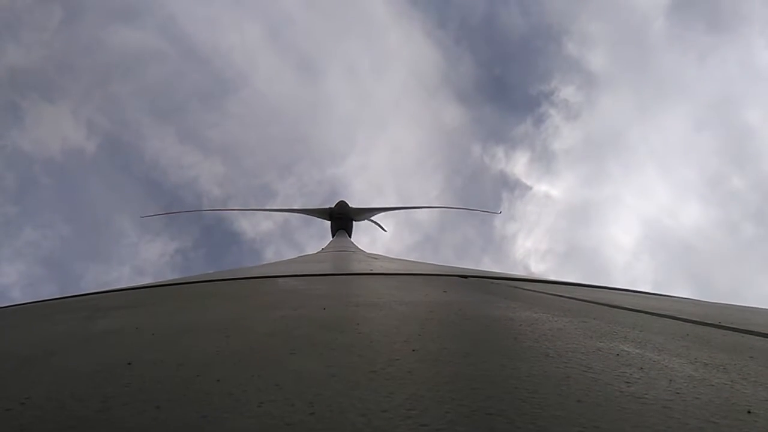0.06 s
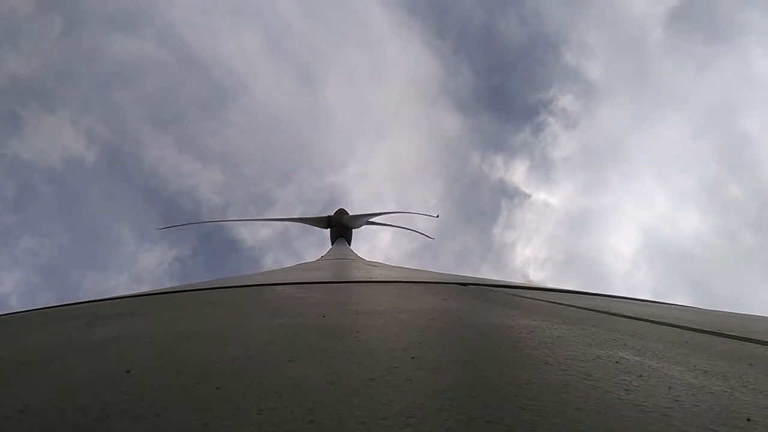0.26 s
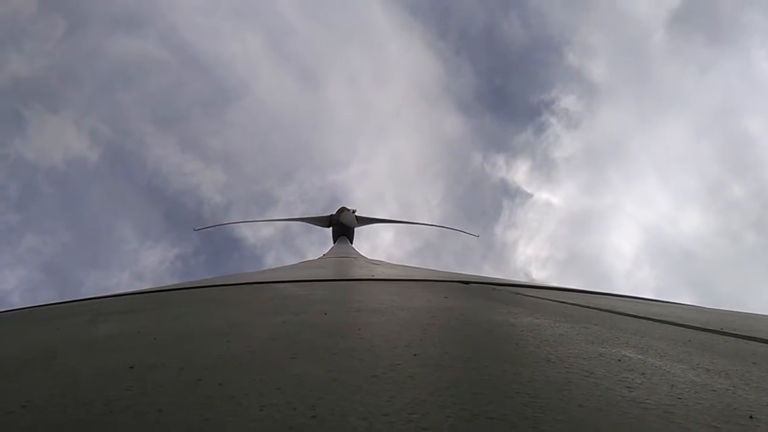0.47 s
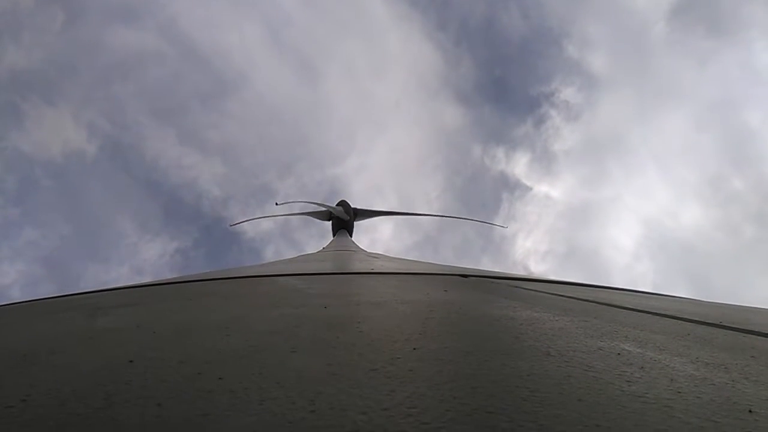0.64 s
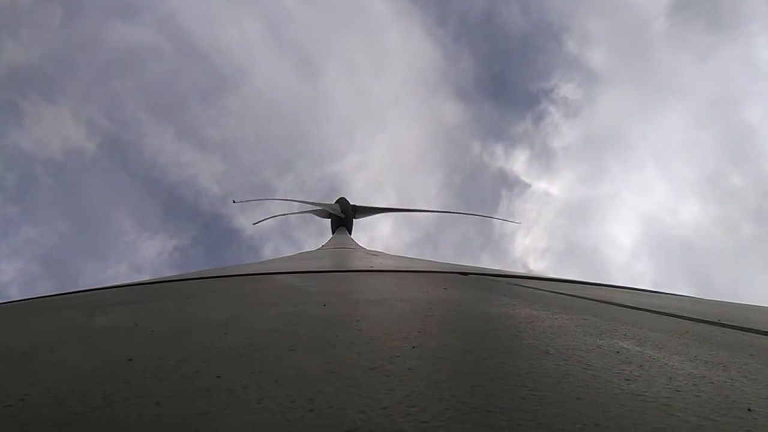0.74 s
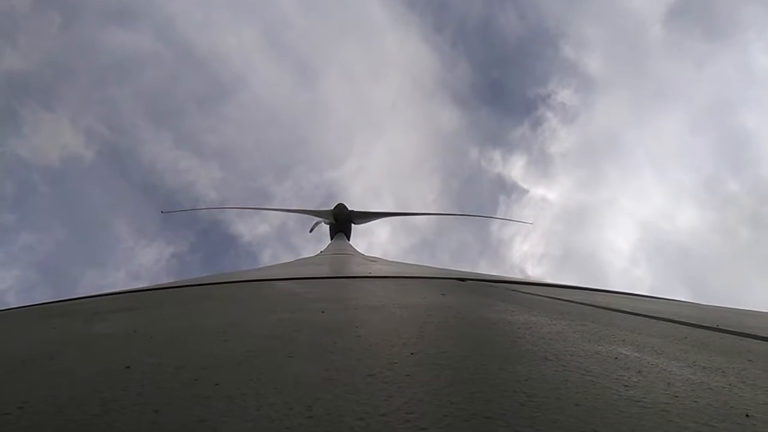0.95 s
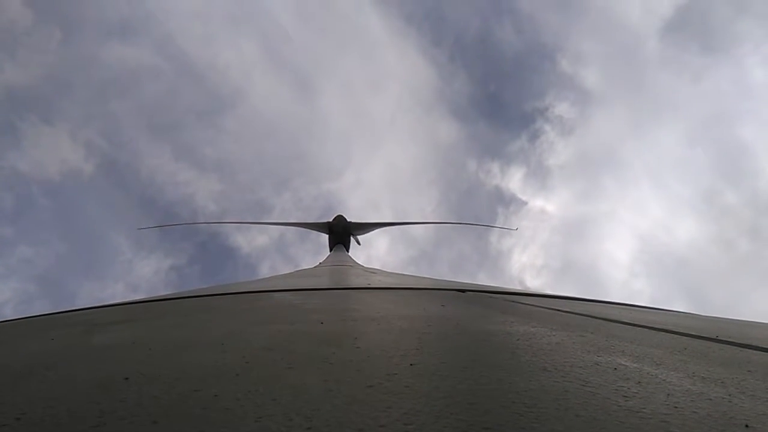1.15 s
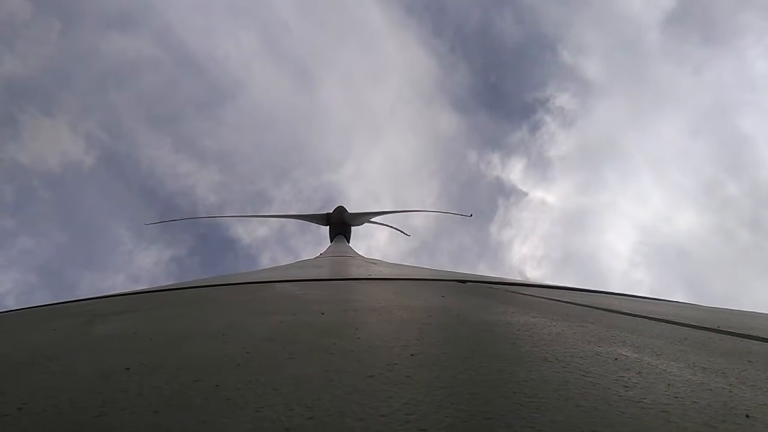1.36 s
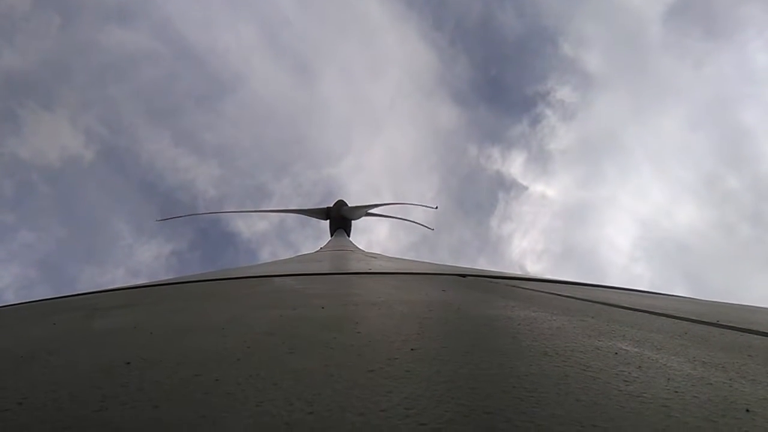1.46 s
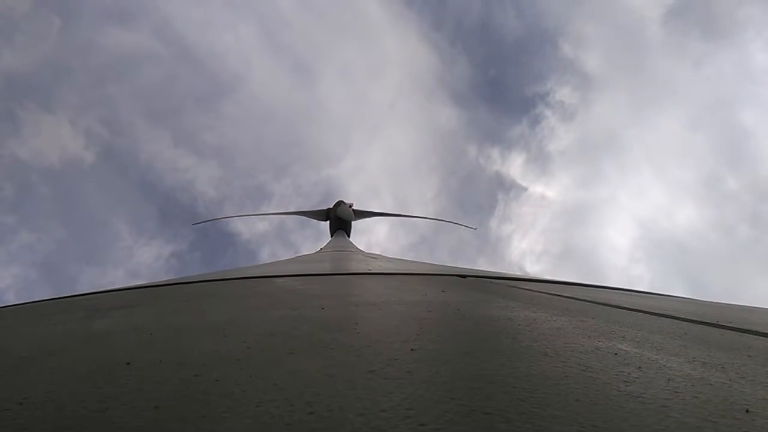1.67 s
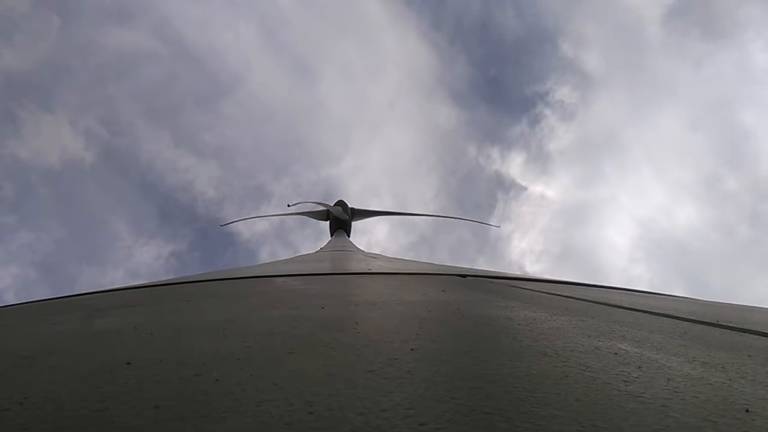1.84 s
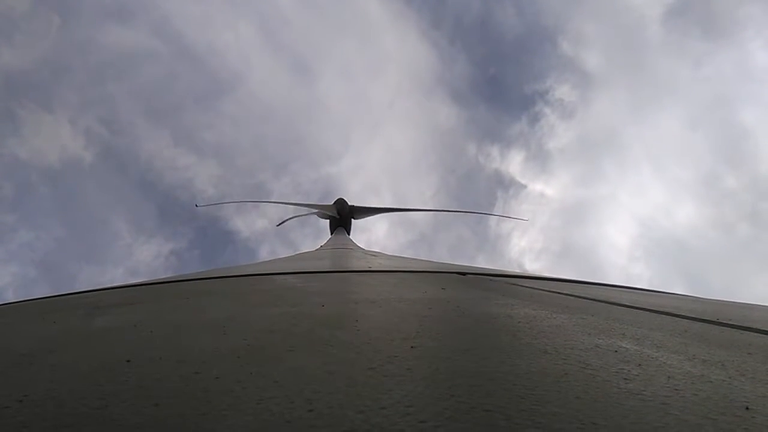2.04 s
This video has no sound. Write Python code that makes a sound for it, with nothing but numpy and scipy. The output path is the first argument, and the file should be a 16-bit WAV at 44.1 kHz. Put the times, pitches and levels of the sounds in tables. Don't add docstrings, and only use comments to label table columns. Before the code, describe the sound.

Low, lumpy wind buffeting dominates outdoors, swelling and dropping with thumps and pops. Fingers click and rub the camera case early on; distant turbine air hisses faintly, and one soft blade swish passes near the end.

```python
import sys
import numpy as np
from scipy import signal
from scipy.io import wavfile
from scipy.ndimage import uniform_filter1d

SR = 44100
rng = np.random.default_rng(int(sys.argv[2]) if len(sys.argv) > 2 else 0)


def bounce(signal):
    frames = np.transpose(np.atleast_2d(signal))
    limited = np.clip(frames, -1, 1)
    pcm = np.round(limited * 32767).astype(np.int16)
    wavfile.write(sys.argv[1], SR, pcm)


def ratio_of_db(decibels):
    return 10 ** (np.asarray(decibels, float) / 20)


N = 92610


def evened(x):
    return x / np.sqrt(np.mean(x ** 2) + 1e-20)


def read(points, hz):
    f, value = np.transpose(points)
    return np.interp(np.log(hz + 1), np.log(f + 1), value)


def add(mix, start_s, sound):
    part = mix[round(start_s * SR):][:len(sound)]
    part += sound[:len(part)]


def bins_and_times(size):
    hz = np.fft.rfftfreq(size, 1 / SR)[:, None]
    t = np.arange(N * 4 // size + 5) * size / 4 / SR
    return hz, t


def noise(db, size):
    a, b = rng.standard_normal(db.shape[::-1] + (2,)).T
    return signal.istft((a + 1j * b) * ratio_of_db(db), nperseg=size, noverlap=size * 3 // 4)[1][:N]


def patches(shape, bins, frames):
    z = rng.standard_normal(shape[::-1]).T
    z = uniform_filter1d(z, size=bins, axis=0)
    return evened(uniform_filter1d(z, size=frames, axis=1))


def unit(db):
    return db - 10 * np.log10((ratio_of_db(db) ** 2).sum(0, keepdims=True))


# t/s, level/dB
GUST = [(0.0, -63), (0.06, -39.5), (0.13, -53), (0.3, -23.5), (0.58, -21.5), (0.87, -40), (0.99, -36),
        (1.08, -55), (1.14, -22), (1.22, -31.5), (1.48, -30.5), (1.52, -25.5), (1.64, -36.5), (1.75, -33),
        (1.78, -42.5), (1.83, -32.5), (1.89, -50), (2.1, -37.5)]
# f/Hz, level/dB [dB per Hz]
CALM = [(12, -65), (20, -31), (40, -6.5), (65, 6), (310, -28.5), (341, -29.5), (515, -50), (900, -33),
        (1170, -74), (1980, -120)]
# f/Hz, level/dB [dB per Hz]
GALE = [(12, -43), (20, 6.5), (70, 1), (126, 2), (217, -6), (323, -13), (409, -23), (715, -37), (1500, -55),
        (1950, -83), (3300, -120)]


def gusts():
    calm_db, gale_db, gust_db = -41, -24.5, -1.5
    patch_db, lump_db, lumps_per_s = 3, 1.5, 22
    hz, t = bins_and_times(2048)
    strong = np.clip((np.interp(t, *np.transpose(GUST)) - calm_db) / (gale_db - calm_db), 0, 1)
    calm = read(CALM + [(3000, -86)], hz)
    gale = read(GALE + [(4000, -100)], hz)
    colour = (1 - strong) * calm + strong * gale
    colour = unit(colour + patch_db * patches(colour.shape, bins=4, frames=3))
    eddies = evened(noise(colour, size=2048))

    power = uniform_filter1d(uniform_filter1d(eddies ** 2, size=2500), size=1500)
    steady = eddies / np.sqrt(power)
    s = np.arange(N) / SR
    rates = lumps_per_s * np.geomspace(.3, 2, num=24)
    lumps = evened(sum(np.sin(2 * np.pi * (f * s + rng.random())) for f in rates))
    lumpy = steady * evened(ratio_of_db(lump_db * lumps))
    level = ratio_of_db(gust_db + np.interp(s, *np.transpose(GUST)))
    return (lumpy + flutter(np.interp(s, t, strong))) * level


def tower():
    centre_hz, width_hz, level_db = 185, 50, -59
    hz, t = bins_and_times(2048)
    field = -20 * np.log10(1 + (2 * (hz - centre_hz) / width_hz) ** 2) + 0 * t
    return ratio_of_db(level_db) * evened(noise(field, size=2048))


# f/Hz, level/dB [dB per Hz]
WASH = [(80, -32.5), (190, -8.5), (450, -23.5), (1300, -33.5), (2400, -44.5), (5000, -46), (7800, -43.5),
        (14500, -56.5)]
# t/s, level/dB, boost or scoop of a middle band [dB]
WASH_LEVEL = [(0.0, -63.5, 2), (.1, -59, -8), (.2, -57.5, 1), (0.4, -56.5, -0.5), (0.67, -57.5, 0.5),
              (.95, -62, 6), (1.07, -64.5, -5.5), (1.33, -62, -2.5), (1.45, -60.5, -1.5),
              (1.74, -60.5, 1.5), (2.1, -61, -0.5)]


def wash_power(hz, t):
    wash_db, patch_db, scoop_hz, scoop_octaves = 8, .8, 5060, 0.34
    s, db, scoop_db = np.transpose(WASH_LEVEL)
    wash = unit(read(WASH, hz)) + wash_db + np.interp(t, s, db)
    scoop = np.exp(-(np.log2((hz + 1) / scoop_hz) / scoop_octaves) ** 2 / 2)
    wash = wash + np.interp(t, s, scoop_db) * scoop
    return ratio_of_db(wash + patch_db * patches(wash.shape, bins=4, frames=40)) ** 2


# t/s, length [s], level/dB, share of the high resonance [0-1], fade by 60 dB [s]
RUBS = [(0.033, 0.013, -62, .7, 0.04), (0.048, .03, -66, 0, 0.64), (0.307, 0.048, -63.5, 0.6, 0.074),
        (0.378, 0.019, -52.5, 0.58, 0.019), (0.525, 0.012, -43, 0.32, 0.05), (0.535, 0.0075, -52, 0, 0.053),
        (.577, 0.0099, -54, 0.5, 0.033), (0.595, 0.0084, -49.5, 0.25, 0.026),
        (0.717, 0.008, -60, 0.5, 0.026), (0.61, 0.015, -47, 0.34, 0.044), (0.732, 0.038, -59.5, 0.79, 0.46),
        (0.817, 0.017, -48, 0.88, 0.14), (0.826, 0.058, -59.5, 0.94, 0.53), (1.004, 0.069, -72, 1, .05),
        (1.13, 0.069, -67.5, 1, 0.05), (1.07, 0.19, -75.5, 1, .3)]
# f/Hz, level/dB [dB per Hz]
RUB_LOW = [(1000, -18), (2300, -19), (3300, -8), (4200, -3), (5500, -6), (6300, -15), (9000, -24),
           (14000, -33)]
# f/Hz, level/dB [dB per Hz]
RUB_HIGH = [(2500, -10.5), (5500, -20), (7200, 1), (8600, 0.5), (11000, -16.5), (14000, -21)]


def rub_power(hz, t):
    rise_s, grit_db = .004, 4
    low, high = (ratio_of_db(2 * unit(read([(200, -52)] + k, hz))) for k in (RUB_LOW, RUB_HIGH))
    grit = ratio_of_db(2 * grit_db * patches((len(hz), len(t)), bins=8, frames=2))
    power = 0
    for start, length, db, share, t60 in RUBS:
        fade_db = -60 * np.maximum(t - start - length, 0) / t60
        shape = np.clip((t - start) / rise_s, 0, 1) * ratio_of_db(db + fade_db)
        power = power + shape ** 2 * ((1 - share) * low + share * high) * grit
    return power


TICK_S = [.0426, .0433, .0456, .0518, .2266, .2268, .5355, .5769, .7158, .7179, .7194, .7212, .7433, .747,
          .752, .8183, 1.24, .0517, .5768, .8182, .761]
# level/dB, snap f/Hz, ring level/dB, ring fade by 60 dB [s]
TICKS = [(-40, 8000, -20, .006), (-34, 8100, -8, .006), (-41, 7500, -14, .005), (-18.5, 7430, -21, 0.018),
         (-35, 11000, -30, .006), (-24, 6200, -9.5, 0.027), (-29.5, 6300, 0.5, 0.0088),
         (-19.5, 8500, -14.5, 0.014), (-37, 7700, -12, .006), (-20, 7230, -10.5, 0.016),
         (-32, 4800, -2.5, 0.019), (-30, 6600, -15, .006), (-47, 6700, -15, .01), (-44, 8700, -20, .006),
         (-40, 8500, -23, .006), (-18.5, 8200, -15, 0.011), (-50, 6800, -27, .006), (-28, 11000, -40, .006),
         (-38, 12000, -40, .006), (-37, 13600, -40, .006), (-44, 9300, -30, .006)]
# f/Hz, level/dB
RING = [
    (4050, 0),
    (4400, -6),
    (3720, -8),
]


def ticks():
    lead_s, snap_s = .001, .00011
    ring_rise_s, sag, sag_s = .0004, .4, .0012
    out = np.zeros(N)
    u = np.arange(2000) / SR - lead_s
    late = np.maximum(u, 0)
    band = signal.butter(2, [5000, 11500], "band", fs=SR)
    sagging = late + sag * sag_s * (1 - np.exp(-late / sag_s))
    ring = sum(ratio_of_db(db) * np.sin(2 * np.pi * hz * sagging) for hz, db in RING)
    ring = (1 - np.exp(-late / ring_rise_s)) * ring
    rattle_level = ratio_of_db(-32.5 - 60 * late / 0.052) + ratio_of_db(-16 - 60 * late / .007)
    rattle_level = rattle_level * ratio_of_db(60 * (u - late) / .003)
    grains = rng.standard_normal((len(TICKS), 2000))
    for start, (db, snap_hz, ring_db, t60), z in zip(TICK_S, TICKS, grains):
        snap = np.exp(-(u / snap_s) ** 2 / 2) * np.cos(2 * np.pi * snap_hz * u)
        rattle = signal.lfilter(*band, z) * rattle_level
        ringing = ratio_of_db(ring_db - 60 * late / t60) * ring
        add(out, start - lead_s, ratio_of_db(db) * (snap + rattle + ringing))
    return out


# t/s, level/dB, f/Hz, fade by 60 dB [s]
KNOCKS = [(.0519, -27, 2770, .004), (0.0509, -34.5, 1140, 0.0042), (0.0575, -24, 1290, 0.0013),
          (.0578, -37, 606, 0.0056), (0.0817, -42, 1500, .004), (0.227, -22, 2700, 0.0017),
          (0.5777, -38.5, 2720, 0.0045), (0.7176, -32, 2470, 0.0047), (0.72, -38.5, 2680, 0.0083),
          (.7415, -48, 2680, .005), (.8185, -32.5, 2600, 0.0075), (.8183, -31, 1050, 0.0082)]


def knocks():
    out, t = np.zeros(N), np.arange(2000) / SR
    for start, db, pitch_hz, t60 in KNOCKS:
        add(out, start, ratio_of_db(db - 60 * t / t60) * np.sin(2 * np.pi * pitch_hz * t))
    return out


def burst(u):
    return (1 - u ** 2) * np.exp(-u ** 2 / 2)


def flutter(strong):
    per_s, level_db, spread_db, widths_ms = 160, -18.5, 2.5, (0.42, 0.51, 0.75)
    t_ms = np.arange(-200, 201) / SR * 1000
    out = np.zeros(N)
    for width_ms in widths_ms:
        a, b, c = rng.random((N, 3)).T
        happens = a < strong * per_s / len(widths_ms) / SR
        train = happens * np.sign(b - .5) * ratio_of_db(-spread_db * np.log(c + 0.049))
        out += np.convolve(train, burst(t_ms / width_ms), "same")
    return ratio_of_db(level_db) * out


# t/s, level/dB, f/Hz, length [s]
ROLLS = [(0.22, -33, 85, 0.027), (0.24, -23, 58, 0.012), (0.31, -17.5, 100, 0.02), (0.421, -30, 82, 0.035),
         (0.47, -14.5, 69.5, 0.019), (0.58, -16, 64, 0.018), (0.75, -32, 61.6, 0.04),
         (.43, -30.5, 147, 0.033), (1.7, -31.5, 59, 0.046), (1.9, -33, 72, 0.04), (0.61, -36, 66, 0.04),
         (1.2, -27.5, 68, 0.037), (0.978, -28.5, 56, 0.065), (1.153, -22, 113, 0.017),
         (1.138, -25.5, 156, 0.01), (1.18, -28, 210, 0.019), (.33, -34, 150, .025),
         (1.5, -28.5, 147.5, 0.0346), (1.165, -25.5, 397, 0.0083), (1.164, -34, 700, 0.0049),
         (1.279, -22, 74.4, 0.038), (1.373, -31.5, 58.5, 0.06), (1.527, -25, 68, 0.04),
         (1.736, -22, 65, 0.017), (1.823, -29, 73, 0.013), (2.019, -42, 106, 0.033),
         (2.084, -35.5, 100, 0.032)]


def rolls():
    s, out = np.arange(N) / SR, np.zeros(N)
    for at, db, pitch_hz, length in ROLLS:
        swell = np.exp(-2 * ((s - at) / length) ** 2)
        out += ratio_of_db(db) * swell * np.cos(2 * np.pi * pitch_hz * (s - at))
    return out


# t/s, level/dB, width [ms]
POPS = [(.306, -29, 0.68), (.345, -35, 0.4), (.407, -26.5, 0.56), (0.458, -42, 0.46), (0.478, -27.5, 0.55),
        (0.545, -30, 0.7), (0.5881, -21, 0.55), (0.7438, -27, 1.45), (1.121, -20, 1.17),
        (1.1385, -14.5, 1.1), (1.1392, -29, 0.57), (1.172, -31, 0.62), (1.211, -32, 0.93),
        (1.1623, -31, 0.54), (1.1644, -30, 0.75), (1.2, -28, 0.99), (1.245, -28.5, 1.05), (1.265, -28, 1),
        (1.3577, -22, 0.91), (1.504, -19, 1.26), (1.723, -47, 1.7), (2.002, -32, 1.63)]


def pops():
    s, out = np.arange(N) / SR, np.zeros(N)
    for at, db, width_ms in POPS:
        out += ratio_of_db(db) * burst((s - at) * 1000 / width_ms)
    return out


# t/s, level/dB, centre f/Hz
SWISH = [
    (1.3, -95, 5200),
    (1.5, -80, 5000),
    (1.6, -77, 4950),
    (1.66, -68.5, 4930),
    (1.76, -71, 4850),
    (1.84, -70.5, 5050),
    (1.89, -69, 4800),
    (1.97, -69, 4620),
    (2.03, -75, 4500),
    (2.1, -74, 4500),
]


def swish_power(hz, t):
    width_hz, patch_db = 1050, 2.5
    strand_hz, strand_db, strand_from_s = 3680, 1, 1.86
    upper_hz, upper_db = 5850, -2
    s, db, centre = np.transpose(SWISH)
    main = 1 / (1 + (2 * (hz - np.interp(t, s, centre)) / width_hz) ** 2) ** 2.4
    growth = np.clip((t - strand_from_s) / .04, 0, 1 + 40 * np.maximum(t - 1.98, 0))
    strand = growth * ratio_of_db(2 * strand_db) / (1 + (4 * (hz - strand_hz) / width_hz) ** 2) ** 2
    upper = ratio_of_db(2 * upper_db) / (1 + (4 * (hz - upper_hz) / width_hz) ** 2) ** 2
    bumps = main + strand + upper
    mottle_db = patch_db * patches(bumps.shape, bins=2, frames=10)
    return bumps / bumps.sum(0) * ratio_of_db(2 * np.interp(t, s, db) + mottle_db)


# f/Hz, share [0-1]
WIDE = [(4600, 0), (5400, .22), (7500, .68), (14000, .6)]


def stereo_hiss():
    hz, t = bins_and_times(256)
    power = wash_power(hz, t) + rub_power(hz, t) + swish_power(hz, t)
    field = 10 * np.log10(power) + 10 * np.log10(4 / 3)
    bands = (12 * np.log(hz[:, 0] / 300 + 1)).astype(int)
    band, block = np.meshgrid(bands, np.arange(len(t)) // 32, indexing="ij")
    chance = rng.random((block.max() + 1, band.max() + 1)).T
    apart = chance[band, block] < read(WIDE, hz)
    side = noise(field + np.where(apart, -4, -100), size=256)
    mid = noise(field - np.where(apart, 3, 0), size=256)
    return mid + side * np.array([[1], [-1]])


def scene():
    wind = gusts() + rolls() + pops()
    case = ticks() + knocks()
    return wind + tower() + case + stereo_hiss()


def low_pass(x):
    return signal.sosfilt(signal.butter(12, 14810, fs=SR, output="sos"), x)


def record(dry):
    low_cut_hz, limit, edge_hz = 44.8, 0.27, 14350
    thin = signal.sosfilt(signal.butter(5, low_cut_hz, "high", fs=SR, output="sos"), dry)
    thin = limit * np.tanh(thin / limit)
    treble_cut = signal.firwin(511, edge_hz, window=("kaiser", 9), fs=SR)
    cut = signal.oaconvolve(thin, treble_cut[None], "same")
    return low_pass(cut)


dry = scene()
out = record(dry)
bounce(out)
```